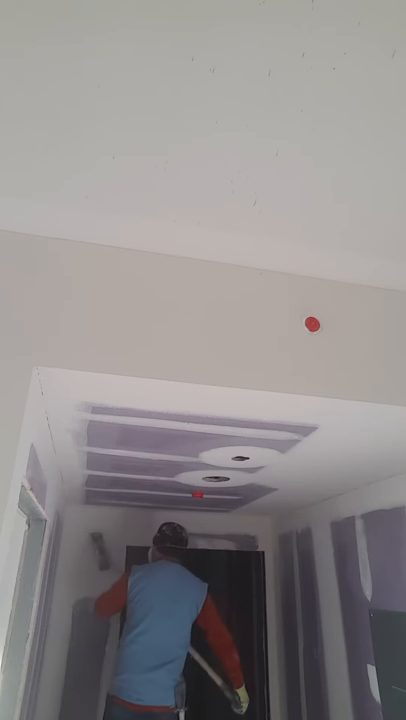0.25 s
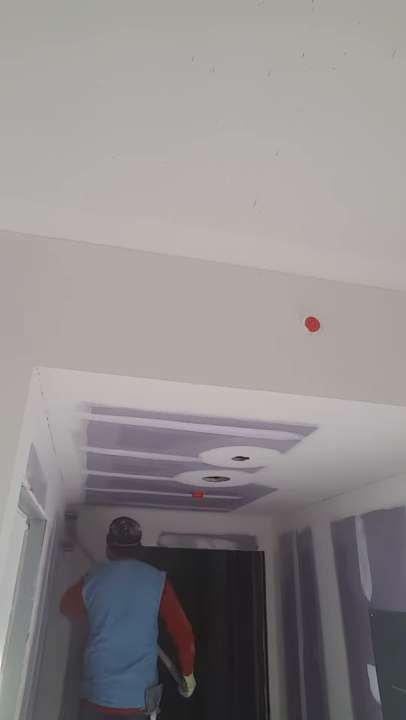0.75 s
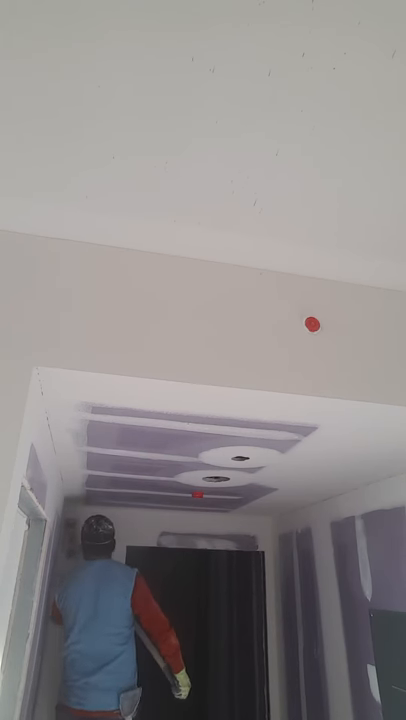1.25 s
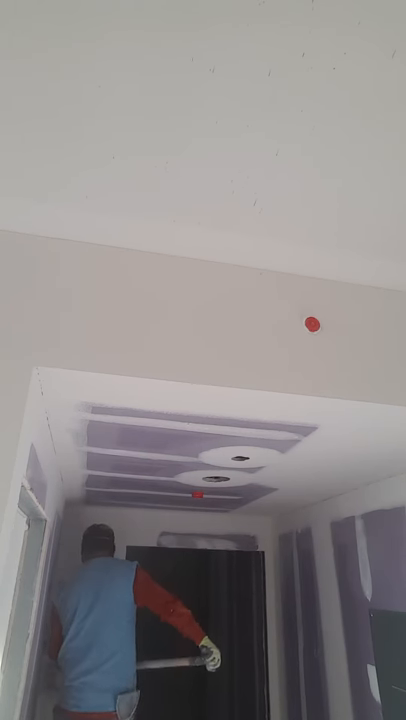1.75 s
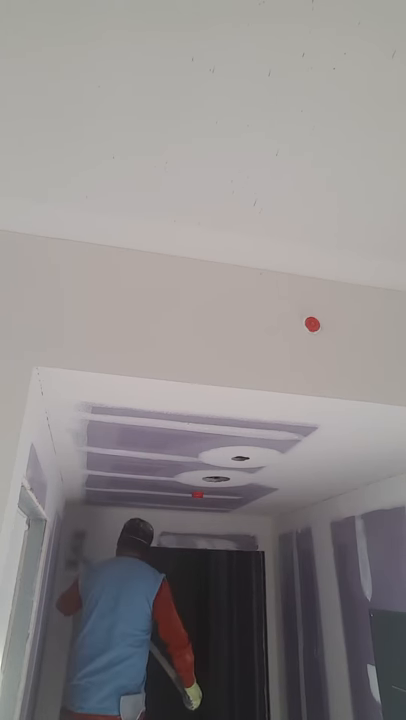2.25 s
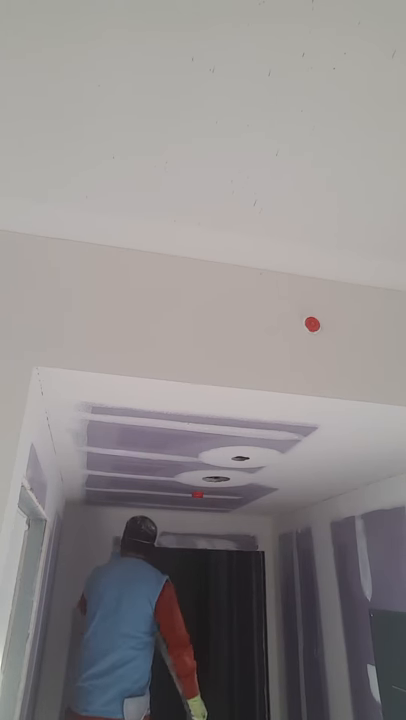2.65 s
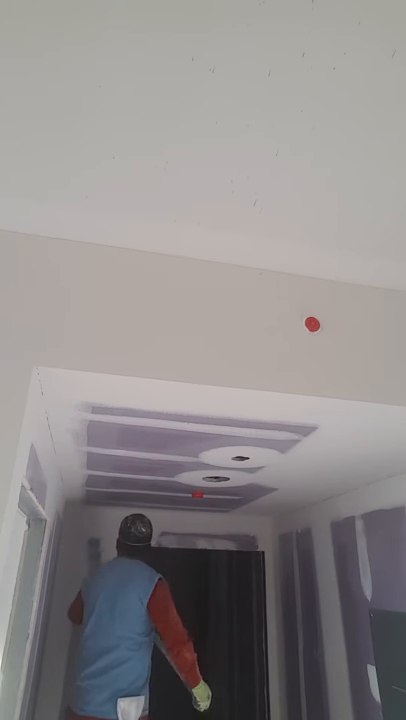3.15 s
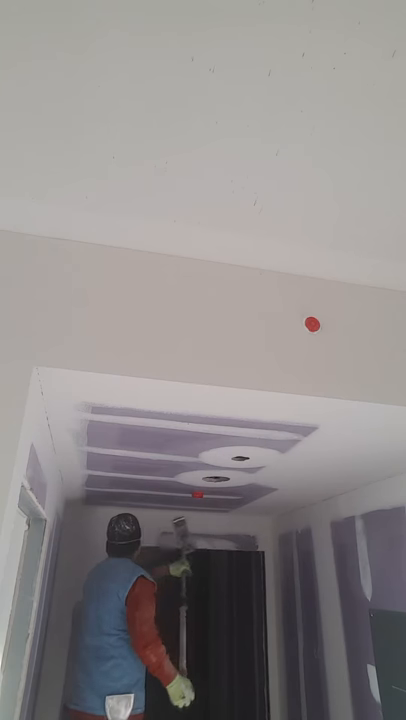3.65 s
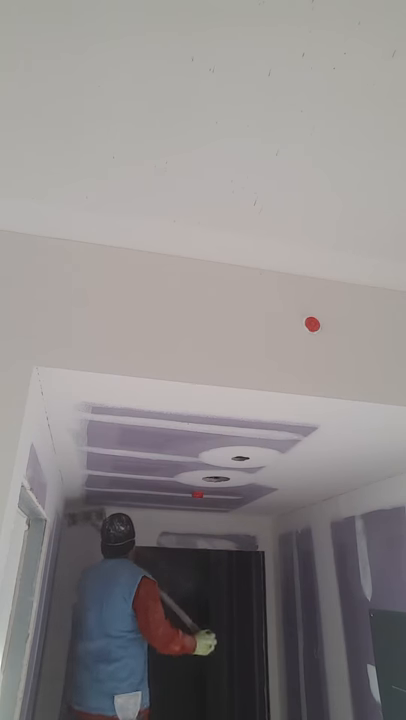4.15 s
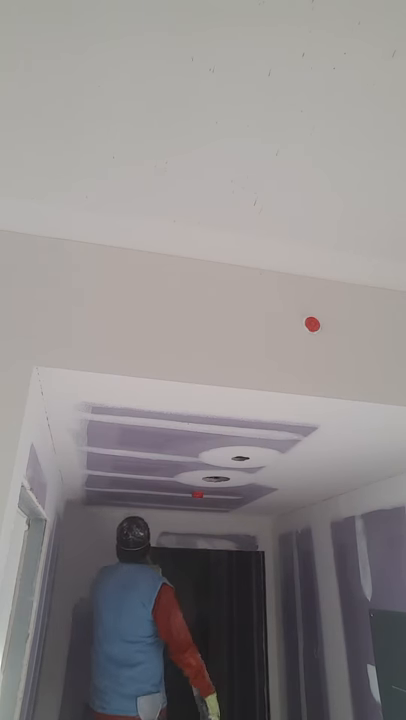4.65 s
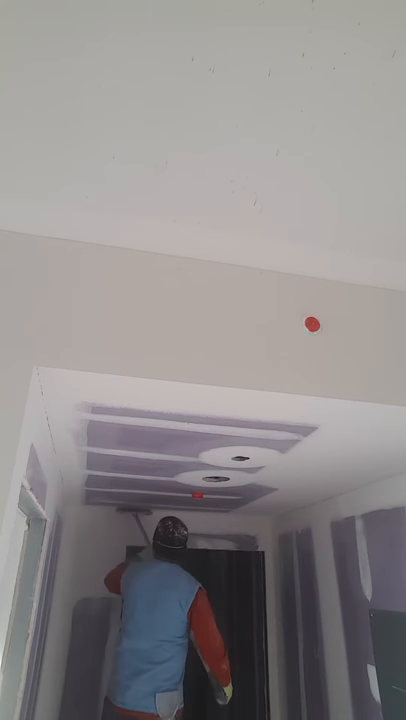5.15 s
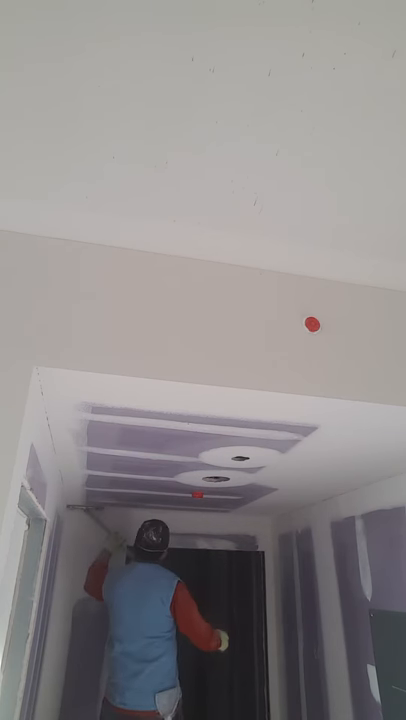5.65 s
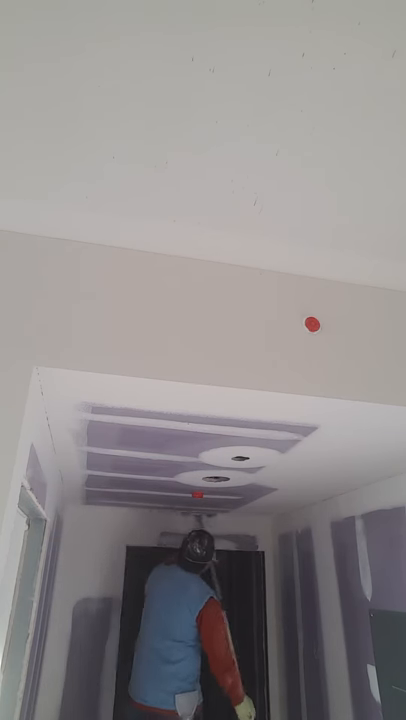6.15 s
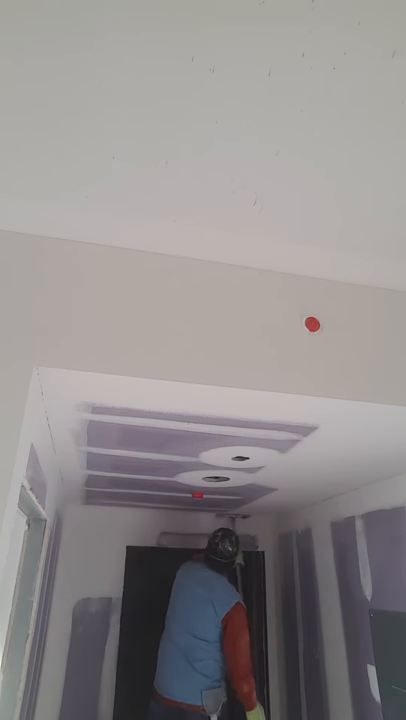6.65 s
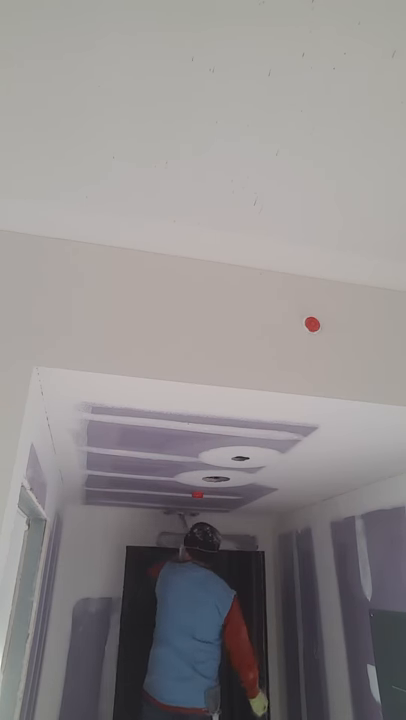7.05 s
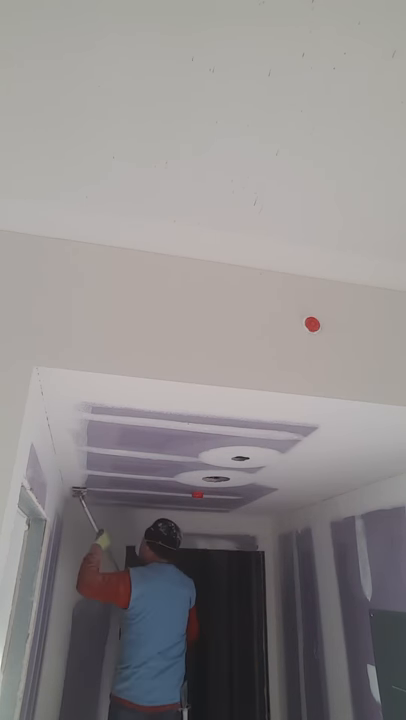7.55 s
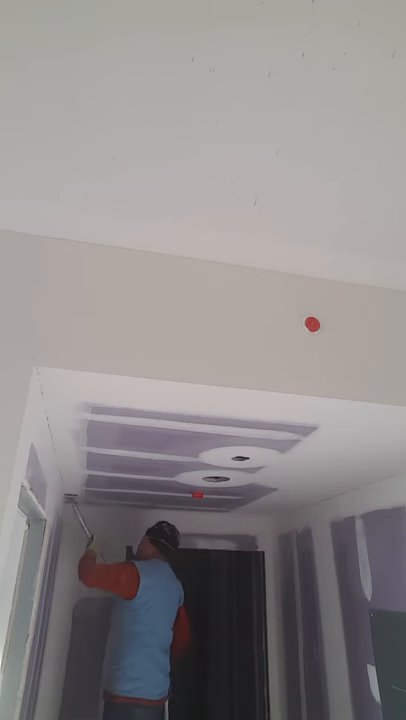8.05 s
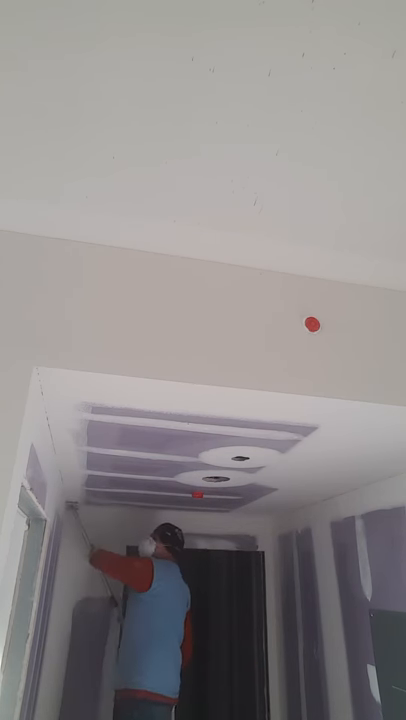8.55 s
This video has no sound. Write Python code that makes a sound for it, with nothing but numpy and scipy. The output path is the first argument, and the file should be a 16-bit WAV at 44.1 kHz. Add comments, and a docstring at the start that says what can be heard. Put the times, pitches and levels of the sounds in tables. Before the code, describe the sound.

A pole sander is rubbed back and forth over dried drywall compound throughout, about two or three uneven strokes a second. Each stroke is a dry, gritty hiss with a coarser scrape and low board rumble beneath, growing louder and brighter with speed and sitting slightly to the right. The head bumps the hollow wall with booming knocks and plastic clacks at about 0.4, 0.8, 1.4, 1.8, 3.3 and 4.2 seconds. The swivel joint ticks now and then, and the pad judders briefly near 1.3 and 1.8 seconds. From about 4.5 to 5.2 seconds the sanding drops to a light brushing. It returns strongly with a cluster of knocks between 5.3 and 5.8 seconds, then continues with more bumps around 6.5, 6.9, 7.7 and 8.4 seconds. The bare room rings for about a second after each knock, over a faint low building murmur.

```python
"""Sanding a wall with a pole sander.

A sanding pad is pushed to and fro over dried joint compound in a bare alcove. Its grit hisses louder
and brighter the faster it moves, and the wallboard rumbles under it. At the turns the hollow wall
booms as the swivel head bumps a corner, or just rumbles briefly. Now and then the joint clicks or the
pad judders. The empty room rings for about a second, over the faint murmur of the building."""
import sys
import numpy as np
from scipy import signal
from scipy.fft import rfft, irfft, next_fast_len
from scipy.io import wavfile
from scipy.ndimage import uniform_filter1d

SR = 44100
rng = np.random.default_rng(int(sys.argv[2]) if len(sys.argv) > 2 else 0)


def store_wav(level_fs):
    """Save 16-bit WAV to argv[1]."""
    pcm = np.round(np.clip(np.atleast_2d(level_fs), -1, 1) * 32767)
    wavfile.write(sys.argv[1], SR, pcm.T.astype(np.int16))


N = 388521
TIME = np.arange(N) / SR
RING = int(1.3 * SR)  # samples allowed for one sound to die away
LEFT_LAG_S = 0.00016  # sound reaches the left side a little later
OPPOSITE = np.array([[1], [-1]])  # adds to the left, subtracts from the right


def gain(db):
    """Turn decibels into a multiplier."""
    return 10 ** (np.asarray(db) / 20)


def unit(x):
    """Scale x to an average strength (rms) of 1."""
    return x / np.sqrt(np.mean(x ** 2))


def ease(share):
    """Rise from 0 to 1 along a quarter of a sine wave."""
    return np.sin(np.pi / 2 * np.clip(share, 0, 1))


def drift(rate_hz):
    """A smooth random wobble of strength 1."""
    step = max(int(SR / rate_hz), 1)
    stairs = np.repeat(rng.standard_normal(N // step + 1), step)
    return unit(uniform_filter1d(stairs, step)[:N])


def at_hz(points, hz):
    """Read between (frequency, value) points, giving each octave equal space."""
    f, value = np.transpose(points)
    return np.interp(np.log(hz + 1), np.log(f), value)


def shape(x, response):
    """Multiply each frequency f in x by response(f)."""
    size = next_fast_len(x.shape[-1] + 4096, True)
    f = np.fft.rfftfreq(size, 1 / SR) + 1e-3
    return irfft(rfft(x, size) * response(f), size)[..., :x.shape[-1]]


def colour(x, tone):
    """Give x the bass and treble of a tone table, at strength 1."""
    return unit(shape(x, lambda f: gain(at_hz(tone, f))))


def resonate(x, notes):
    """Ring an object's natural notes, with alternating signs; narrow ones ring longer."""
    return shape(x, lambda f: sum((-1) ** k * gain(db) / (1 + 1j * (f * f - hz * hz) / (f * width))
                                  for k, (hz, width, db) in enumerate(notes)))


def cut(x, kind, hz, order):
    """Soften the treble ("lowpass") or bass ("highpass"); a higher order cuts more steeply."""
    return signal.sosfilt(signal.butter(order, min(hz, SR / 2 - 1), kind, fs=SR, output="sos"), x)


def at_level(x, db):
    """Scale x so that its first 50 ms have the given level."""
    return x * gain(db) / np.sqrt(np.mean(x[:, :SR // 20] ** 2))


def add(out, x, start_s):
    """Mix x into out at the given time."""
    i = max(int(start_s * SR), 0)
    out[:, i:i + x.shape[1]] += x[:, :N - i]


# Tone of the building's murmur: f/Hz, relative level/dB
MURMUR_TONE = [(20, -6), (60, -5), (120, -9), (300, 3), (700, -5.5), (2000, -18), (8000, -14), (15000, -53)]
def murmur(level_db=-52.5):
    """The empty building murmurs, faint and low."""
    mid, side = (colour(rng.standard_normal(N), MURMUR_TONE) for _ in range(2))
    return gain(level_db + 3.6 * drift(2.6)) * (mid + 0.52 * side * OPPOSITE)


# How long the bare room rings: f/Hz, fade time/s (for a drop of 60 dB)
ROOM_FADES = [(80, 0.6), (220, 0.96), (560, 1.0), (1470, 0.88), (3000, 0.51), (7000, 0.21), (15000, 0.63)]
def room(direct_db, early_db, early_s=0.018, shared_hz=480):
    """A pulse from one spot on the wall: the direct sound, early echoes from the alcove, a long tail."""
    t, f = TIME[:RING], np.fft.rfftfreq(RING, 1 / SR)
    mid, side = rfft(rng.standard_normal((2, RING)))
    likeness = 1 / (1 + (f / shared_hz) ** 3)  # long waves reach both sides alike
    echoes = mid * np.sqrt(1 + likeness) + OPPOSITE * side * np.sqrt(1 - likeness)
    hz, fades_s = np.transpose(ROOM_FADES)
    bands = [np.interp(np.log(f + 1), np.log(hz), row) for row in np.eye(len(hz))]
    tail = sum(irfft(echoes * band, RING) * gain(-60 * t / fade) for band, fade in zip(bands, fades_s))
    early_boost = 1 + gain(early_db) * np.exp(-t / early_s)
    tail = tail * early_boost * np.clip(t / 0.0041, 0, 1) / np.sqrt(SR / 10)
    arrival_s = 0.001086 + np.array([[LEFT_LAG_S], [0]])
    return tail + gain(direct_db) * np.sinc((t - arrival_s) * SR)


# The pad catches on the wall: t/s, length/s, relative level/dB, f/Hz
JUDDERS = [(1.318, 0.038, -26.5, 1840), (1.773, 0.045, -29.5, 383), (4.868, 0.078, -40.5, 620),
           (4.88, 0.056, -43.5, 1750), (5.174, 0.012, -45, 895)]
def pad_judders():
    """The pad sticks and slips in a short burst, which rings one note of the head."""
    out = np.zeros((2, N))
    for start, length, db, hz in JUDDERS:
        slips = rng.standard_normal(RING) * np.sin(np.pi * np.clip(TIME[:RING] / length, 0, 1))
        heard = signal.fftconvolve(slips[None], room(direct_db=-0.5, early_db=-16), axes=1)[:, :RING]
        add(out, at_level(resonate(heard, [(hz, 0.19 * hz, 0)]), db - .5), start)
    return out


# Natural notes of the pole: f/Hz, width/Hz, relative level/dB
POLE_NOTES = [(810, 150, -5), (1040, 95, 0), (1164, 62, 0), (1400, 95, 1.5), (1610, 230, -4.5),
              (2300, 400, -20), (1380, 5.6, 7)]
# Clicks of the joint: t/s, relative tick level/dB, tick f/Hz, relative ring level/dB
JOINT_CLICKS = [(0.137, -26, 3100, -34), (.147, -36, 3180, -33.5), (.748, -23.5, 1830, -24),
                (1.342, -25.5, 2090, -52), (1.452, -38, 2300, -39), (1.83, -27.5, 2200, -45.5),
                (3.291, -26.5, 2270, -47), (4.164, -30.5, 2040, -37), (4.408, -34, 2720, -30.5),
                (4.753, -41.5, 1640, -45), (5.173, -45.5, 4990, -52), (5.213, -38.5, 5100, -30),
                (5.285, -44, 4960, -57), (6.92, -35.5, 5500, -30.5), (7.006, -33, 1110, -38),
                (7.712, -35, 2100, -30), (8.573, -49, 6940, -52)]
def joint_clicks(snap_db=-3.5, snap_s=0.0064):
    """The loose swivel joint ticks, starting with a sharp snap, and leaves the pole ringing."""
    out = np.zeros((2, N))
    snap = 1 + gain(snap_db) * np.exp(-TIME[:RING] / snap_s)
    for start, tick_db, hz, ring_db in JOINT_CLICKS:
        tick = resonate(room(direct_db=-15, early_db=6.5, early_s=0.0052), [(hz, 0.59 * hz, 0)])
        tick = cut(tick * snap, "lowpass", 1.6 * hz, order=3)
        ring = resonate(room(direct_db=1, early_db=-2), POLE_NOTES)
        ring = cut(ring, "lowpass", 2400, order=2)
        add(out, at_level(tick, tick_db - .5) + at_level(ring, ring_db - .5), start)
    return out


# Natural notes of the hollow inside the wall: f/Hz, width/Hz, relative level/dB
HOLLOW_NOTES = [(82, 14, -9), (122, 35, -0.5), (199, 22, 2)]
def wall_boom(pulse, rise_s=0.014):
    """The hollow wall booms, swelling as the heavy board gets moving."""
    boom = cut(resonate(pulse, HOLLOW_NOTES), "lowpass", 218, order=3)
    return cut(boom, "highpass", 72, order=2) * ease(TIME[:RING] / rise_s)


# Natural notes of the wallboard: f/Hz, width/Hz, relative level/dB
BOARD_NOTES = [(240.6, 37, 0.5), (326.5, 66, -1), (390, 73, -1.5), (498.4, 64.5, 0), (560, 142, -2),
               (759, 270, -7.5)]
def board_knock(pulse, note_hz, hardness, rise_s=0.0063):
    """The board rings, with an extra note from the spot right under the head."""
    board = resonate(pulse, BOARD_NOTES)
    board = board + resonate(board, [(note_hz, 50, 5)])
    knock = cut(board, "lowpass", 860 * hardness, order=5)
    return cut(knock, "highpass", 0.63 * note_hz, order=2) * ease(TIME[:RING] / rise_s)


# Quickly fading notes of the plastic head: f/Hz, width/Hz, relative level/dB
HEAD_NOTES = [(830, 230, -2), (1030, 170, 0), (1260, 220, -3.5), (1470, 170, -4), (1660, 190, -4),
              (2010, 330, -3), (2380, 360, -4), (3100, 700, -13)]
def head_clack(pulse, top_hz, gap_s=0.0035):
    """The flat head rattles: one corner first, then two slaps within milliseconds."""
    ring = resonate(pulse, HEAD_NOTES)
    clack = 1.7 * ring
    for lag_s in gap_s * np.cumsum(rng.uniform(0.584, 1.4, size=2)):
        lag = int(lag_s * SR)
        clack += np.pad(ring, ((0, 0), (lag, 0)))[:, :-lag] * rng.uniform(0.99, 1)
    clack = cut(clack, "lowpass", top_hz, order=4)
    return cut(clack, "highpass", 390, order=3)


# Knocks and soft low thuds in the wall, including brief rumbles as the pad turns:
# t/s, boom level/dB, knock level/dB, clack level/dB, board note f/Hz
WALL_THUDS = [(0.14, -51, -39.5, -38.5, 430), (0.41, -16, -17.5, -35, 260), (0.753, -29, -18.5, -19.5, 430),
              (0.797, -33, -19, -23.5, 454), (1.344, -27, -15.5, -23.5, 355), (1.404, -38, -22, -37, 378),
              (1.452, -32.5, -20.5, -20, 457), (1.831, -21, -16.5, -23.5, 430), (1.867, -25, -22, -27, 460),
              (2.41, -38.5, -48, -60, 331), (2.555, -33, -37, -43.5, 495), (3.075, -30, -29.5, -45.5, 290),
              (3.292, -17.5, -16.5, -26.5, 400), (3.384, -48.5, -25.5, -46, 230),
              (3.76, -42, -55, -57, 300), (3.926, -27.5, -28.5, -50.5, 396), (4.165, -34, -21.5, -27, 563),
              (4.939, -39, -49, -59, 646), (5.173, -32, -37.5, -55, 237), (5.21, -26, -43, -38.5, 456),
              (5.297, -30, -18, -22, 467), (5.528, -21, -14.5, -20, 317), (5.562, -30, -18.5, -31.5, 313),
              (5.61, -23, -21, -27.5, 234), (5.804, -31.5, -19.5, -23, 467.3),
              (6.519, -27, -15.5, -22.5, 417), (6.568, -44, -32.5, -38, 510),
              (6.83, -52, -24.5, -34.5, 444), (6.861, -29, -19.5, -27.5, 208),
              (6.919, -32, -26, -34.5, 477), (7.006, -38, -34.5, -33.5, 490), (7.711, -30.5, -24, -24, 430),
              (8.08, -42, -33, -34.5, 575), (8.354, -24, -17.5, -20.5, 420), (8.387, -32, -19, -22.5, 420),
              (8.445, -38, -20.5, -29.5, 480)]
def wall_thuds(ceiling_from_s=5):
    """Each knock, thud or brief rumble sounds the hollow wall, board and head from a new spot."""
    out = np.zeros((2, N))
    for start, boom_db, knock_db, clack_db, note_hz in WALL_THUDS:
        pulse = room(direct_db=-6.5, early_db=-9.5, shared_hz=445)
        hardness = gain(0.24 * (clack_db - knock_db))  # a short, hard contact is brighter
        top_hz = hardness * (3400 if start < ceiling_from_s else 2380)  # duller in the ceiling corner
        boom = at_level(wall_boom(pulse), boom_db)
        knock = at_level(board_knock(pulse, note_hz, hardness), knock_db)
        clack = at_level(head_clack(pulse, top_hz), clack_db)
        add(out, boom + knock + clack, start - .001)
    return out


def pad_bounce(depth_db=2.5, deepest_s=0.031):
    """How many dB the hiss dips as knocks lift the pad; harder knocks lift it further."""
    lift = np.zeros((1, N))
    hardest_db = max(row[2] for row in WALL_THUDS)
    age = TIME[None, :RING] / deepest_s
    for start, _, knock_db, _, _ in WALL_THUDS:
        add(lift, gain(knock_db - hardest_db) * age * np.exp(1 - age), start)
    return depth_db * lift[0]


# Ridges in the dried compound: t/s, change in hiss level/dB
COMPOUND_RIDGES = [(0.736, -0.5), (1.31, 2), (1.526, 2), (1.80, 3), (2.225, 2), (3.25, 4.5), (4.371, -1),
                   (5.51, 2.5), (6.35, 3), (8.05, 0), (8.334, 2.5)]
def ridge_surges(half_crossing_s=0.028):
    """How many dB the hiss changes as the sandpaper bites into each ridge."""
    return sum(db * np.exp(-((TIME - s) / half_crossing_s) ** 2) for s, db in COMPOUND_RIDGES)


# One push or pull a row; most overlap as the pad swings round. All levels are relative:
# t/s, length/s, braking time/s, hiss level/dB, swell from start to end/dB,
# fine grit level against the hiss/dB, rumble level/dB, rasp level/dB
PAD_STROKES = [(-0.161, 0.37, 0.35, -34, -35, -15, 0, 4), (0.357, 0.565, 0.21, -29.5, 6.5, -15, -3, 4.5),
               (0.858, 0.29, 0.024, -30.5, -3.5, -15.0, -5, 2.5),
               (1.127, 0.23, 0.03, -27.5, -10, -14.5, -8, 0.5),
               (1.289, 0.7, 0.18, -30.5, -1.0, -13, 3.5, 2.0), (1.88, 0.55, 0.38, -27.0, 12, -14, -7, 0.5),
               (2.282, 0.331, 0.17, -29.5, 8, -10.5, -6.5, 3.5),
               (2.538, 0.34, 0.24, -29.0, -9.5, -11, -3.5, 2),
               (2.818, 0.28, 0.1, -30.5, 0.5, -11, -1.0, 2.5), (2.998, 0.54, 0.47, -28, 4, -13.5, -7, 1),
               (3.373, 0.44, 0.24, -28, -7, -11.5, -6.5, 0.5),
               (3.677, 0.573, 0.33, -31.5, 21.5, -10, -7.5, 1.0),
               (4.161, 0.47, 0.52, -31.5, -16.5, -9, -3.5, 0), (4.565, 0.44, 0.24, -50, 5, -3, -8.0, -1),
               (4.804, 0.52, 0.09, -49, 14, -9.5, -2, -2), (5.25, 0.48, 0.35, -29, 1.5, -13.5, 2, 7.0),
               (5.695, 0.99, 0.47, -29.0, -0.5, -11.5, -7, 3),
               (6.546, 0.495, 0.28, -31, 4.0, -10.5, -11, 2.0),
               (6.954, 0.47, 0.23, -31.0, -6.5, -10.5, -11, 1.5), (7.211, 0.39, 0.19, -33, 3, -10, -8, 5.5),
               (7.446, 0.38, 0.31, -26, 9, -9, -12, 3.5), (7.757, 0.78, 0.67, -26.0, 8, -12.5, -5, 4.5),
               (8.604, 0.39, 0.2, -28.5, 17.5, -18.5, -13.5, 3.0)]
def strokes(speed_up_s=0.16, resting_db=-58):
    """Each stroke speeds up and brakes. Gives dB curves for hiss, fine grit, rumble and rasp."""
    hiss = np.full(N, gain(resting_db) ** 2)  # between strokes the pad barely brushes the wall
    fine = hiss * gain(-10) ** 2
    rumble, rasp = np.zeros((2, N))
    for start, length, brake_s, hiss_db, swell_db, fine_db, rumble_db, rasp_db in PAD_STROKES:
        on = (TIME > start) & (TIME < start + length)
        t = TIME[on] - start
        speed = ease(t / speed_up_s) * ease((length - t) / brake_s)
        pressure = gain(hiss_db + swell_db * (t / length - .5))
        power = (pressure * speed ** 1.2) ** 2
        hiss[on] += power
        fine[on] += (pressure * gain(fine_db) * speed ** 2.04) ** 2  # the finest grit fades first
        rumble[on] += power * rumble_db  # where strokes overlap, the louder counts for more
        rasp[on] += power * rasp_db
    level_db = 10 * np.log10(hiss) + ridge_surges() - pad_bounce()
    return level_db, 10 * np.log10(fine / hiss), rumble / hiss, rasp / hiss


def rub(tone, db, fade_s, direct_db, likeness=0):
    """Countless grains catch and let go; their echoes blur into a wash that drops 60 dB in fade_s."""
    force = gain(db)
    grains = rng.standard_normal(N) * gain(1.7 * rng.standard_normal(N))  # each has its own strength
    direct = colour(grains, tone) * force
    direct = np.array([np.roll(direct, int(LEFT_LAG_S * SR)), direct])
    keep = np.exp(-np.log(1e6) / (fade_s * SR))  # share of the energy left after one sample
    lingering = np.sqrt(signal.lfilter([1 - keep], [1, -keep], force ** 2))
    mid, side = (colour(rng.standard_normal(N), tone) for _ in range(2))
    wash = mid * np.sqrt((1 + likeness) / 2) + OPPOSITE * side * np.sqrt((1 - likeness) / 2)
    return wash * lingering + gain(direct_db) * direct


def corner_echo(x):
    """The nearby corner adds an echo whose delay slides as the pad travels, shifting the tone."""
    lag_s = .002 + 0.000512 * drift(2.5)
    echo = np.array([np.interp(TIME - lag_s, TIME, channel) for channel in x])
    return x + .22 * echo


# Tones of the five layers of sanding noise: f/Hz, relative level/dB
HISS_TONE = [(1200, -49), (2500, -8.5), (3400, -2.5), (4300, -0.5), (5300, 0.5), (6200, -4.5), (7500, -4.5),
             (9000, -16), (15000, -37)]  # the main hiss of the grit
SHEEN_TONE = [(3500, -22), (5000, -7.5), (5800, 0), (7000, -0.5), (7900, 1), (8700, -7.5), (9800, -16.5),
              (15000, -26)]  # the higher hiss that fast strokes bring out
FINE_TONE = [(5000, -21), (8000, 6.5), (10000, -2), (12000, -1), (14000, -2.5), (15700, -5.5)]  # the finest grit
RASP_TONE = [(500, -24), (800, -8.5), (1150, -6), (1600, -3), (2300, 3), (3200, 0.5), (4500, -5.5),
             (8000, -43)]  # the coarse scrape
RUMBLE_TONE = [(30, -38), (65, 4.5), (105, -0.5), (200, 5), (300, 0.5), (470, 3), (650, -3.5), (1000, -4.5),
               (2500, -40)]  # the shaking board
def sanding():
    """Faster strokes are louder and brighter; pressure adds a coarse rasp and shakes the board."""
    hiss_db, fine_db, rumble_db, rasp_db = strokes()
    effort_db = hiss_db - np.max(hiss_db)  # 0 at the loudest moment
    slip_db = hiss_db + 0.6 * drift(45) + drift(220)  # the pad sticks and slips
    patch_db = 1.2 * drift(7.2)  # the paper meets smoother and coarser patches
    hiss = rub(HISS_TONE, slip_db - 4 - patch_db, fade_s=0.13, direct_db=-5)
    sheen = rub(SHEEN_TONE, slip_db - 2.5 + 0.53 * effort_db + patch_db, fade_s=0.11, direct_db=-7)
    fine = rub(FINE_TONE, slip_db + fine_db + 3.5 + 0.019 * effort_db, fade_s=0.1, direct_db=-3.5)
    rasp_db += -35.5 + 0.56 * effort_db + 0.47 * drift(33)
    rasp = rub(RASP_TONE, rasp_db, fade_s=0.72, direct_db=-7)
    rumble_db += -36.5 + 0.43 * effort_db + 2.4 * drift(9.7)
    rumble = rub(RUMBLE_TONE, rumble_db, fade_s=1.0, direct_db=-2, likeness=0.81)
    return corner_echo(hiss + sheen + rasp) + fine + rumble


def scene():
    """Everything that sounds in the room, in stereo."""
    return sanding() + wall_thuds() + joint_clicks() + pad_judders() + murmur()


# Balance of the microphone's two openings: f/Hz, left minus right level/dB
MIC_BALANCE = [(60, -0.5), (200, -3.5), (380, 0.5), (700, -8), (1290, -1.5), (2380, -3.5), (4400, -11),
               (6000, -13), (8120, -5.5), (10000, -6.5), (15000, -3.5)]
def record(dry, top_hz=15800):
    """The left opening gets less treble; loud peaks are rounded off and the highest treble is cut."""
    shaded = shape(dry, lambda f: gain(0.5 * OPPOSITE * at_hz(MIC_BALANCE, f)))
    rounded = np.tanh(0.57 * shaded) / 0.63
    return signal.sosfilt(signal.ellip(10, .2, 80, top_hz, fs=SR, output="sos"), rounded)


dry = scene()
out = record(dry)
store_wav(out)
```